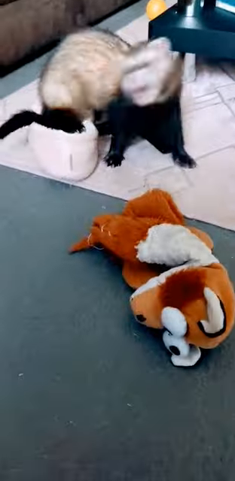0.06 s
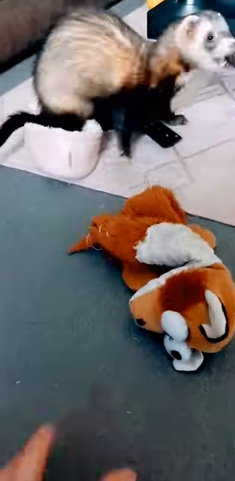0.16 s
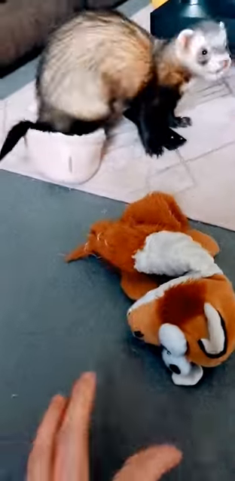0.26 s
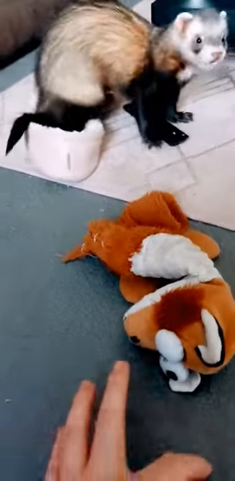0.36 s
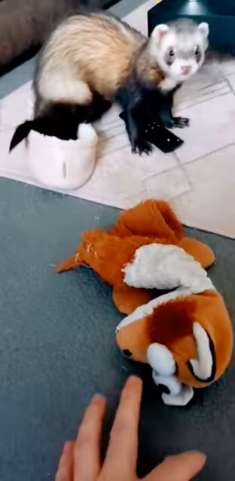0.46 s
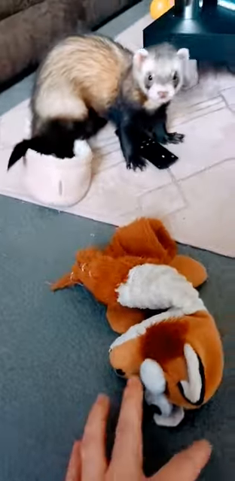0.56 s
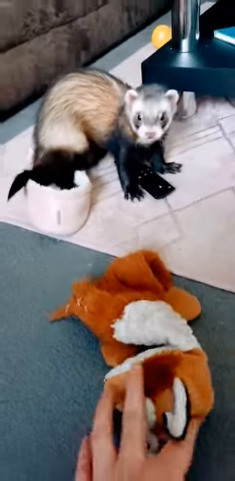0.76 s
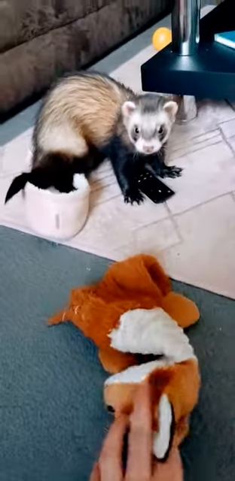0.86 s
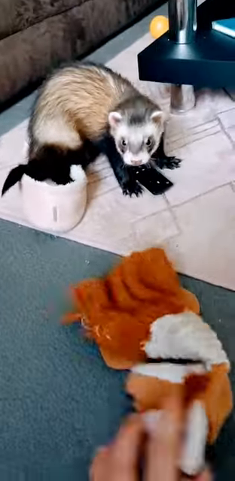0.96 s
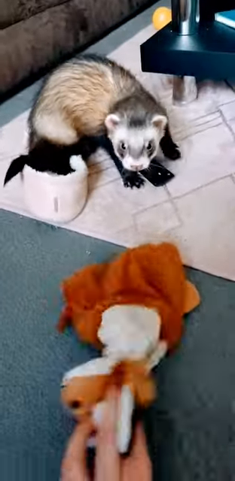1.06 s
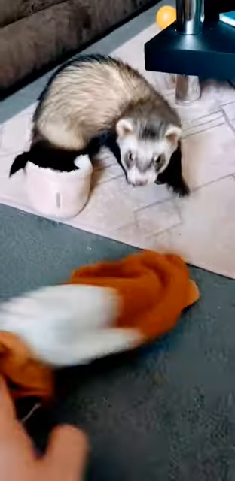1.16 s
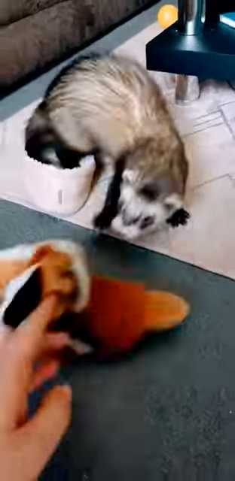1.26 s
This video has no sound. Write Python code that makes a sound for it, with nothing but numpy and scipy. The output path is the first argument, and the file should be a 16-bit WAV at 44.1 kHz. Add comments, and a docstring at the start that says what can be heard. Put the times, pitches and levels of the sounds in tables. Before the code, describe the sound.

Low handling rumble and a stutter of soft bumps as someone picks up a plush toy close to the microphone. Cloth swishes, a sharp tick sounds, then the toy brushes over carpet in a quiet room.

```python
"""A low rumble with a stutter of soft bumps, as someone picks up a plush toy close to the microphone.
The shifting grip rumbles by friction, and each stick and slip excites damped modes. Cloth swishes with
the reach, then the plush brushes over the carpet: in both, many fibres catch and let go. Small impacts
add sharp ticks and, at the end, a hollow knock. The faint hiss of a quiet room lies under it all."""
import sys
import numpy as np
from scipy import signal
from scipy.fft import rfft, irfft
from scipy.io import wavfile
from scipy.ndimage import uniform_filter1d

SR = 44100
rng = np.random.default_rng(int(sys.argv[2]) if len(sys.argv) > 2 else 0)


def generate_wav(signal):
    """Clip the signal to [-1, 1] and save it as 16-bit WAV at the path in sys.argv[1]."""
    frames = np.transpose(np.atleast_2d(signal))
    scaled = np.clip(frames, -1, 1) * 32767
    pcm = np.round(scaled).astype(np.int16)
    wavfile.write(sys.argv[1], SR, pcm)


N = 57330

# Envelopes. Each row: time in seconds, relative level in dB.
GRIP_ENVELOPE = [(0, -60), (0.09, -68), (0.13, -71), (0.195, -78), (0.219, -50), (0.27, -35.5), (0.29, -44),
                 (0.33, -36), (0.4, -31.5), (0.47, -31), (0.521, -29.5), (0.565, -37.5), (0.62, -37.5),
                 (0.655, -47.5), (0.702, -42.5), (0.76, -59), (0.82, -62.5), (0.89, -70), (0.91, -46),
                 (0.96, -52), (1.0, -52.5), (1.085, -45), (1.14, -54), (1.22, -67), (1.3, -85)]
DEEP_ENVELOPE = [(0, -48), (0.04, -67.5), (0.083, -58), (0.12, -87), (0.195, -86.5), (0.214, -42.5),
                 (0.29, -61), (0.34, -55), (0.44, -56), (0.532, -36), (0.565, -55), (0.611, -37),
                 (0.66, -59.5), (0.73, -47.5), (0.839, -69), (0.89, -70), (0.915, -57.5), (1.139, -54.5),
                 (1.24, -73.5)]  # the deepest part of the rumble
CLOTH_ENVELOPE = [(0, -88), (0.19, -70.5), (0.28, -60.5), (0.39, -57), (0.44, -60), (0.52, -55.5),
                  (0.57, -58.5), (0.66, -66.5), (0.8, -78), (1.1, -73.5), (1.3, -72)]
PLUSH_ENVELOPE = [(0, -69), (0.42, -71), (0.52, -68), (0.7, -60), (0.84, -62), (0.93, -61.5), (1.03, -63.5),
                  (1.11, -74), (1.16, -66.5), (1.21, -77), (1.26, -77.5), (1.29, -69.5)]  # plush over the carpet
FUR_ENVELOPE = [(0.25, -82), (0.43, -62), (0.47, -61.5), (0.53, -56.5), (0.56, -60.5), (0.66, -68),
                (0.8, -100)]  # a bright swish as the fingers reach the fur
HISS_ENVELOPE = [(0, -69.5), (0.14, -62.5), (0.5, -70), (0.75, -63), (0.98, -67), (1.15, -72), (1.3, -77)]

# Noise spectra. Each row: frequency in Hz, relative spectral density in dB.
GRIP_SPECTRUM = [(40, -41), (70, -6.5), (97, 3.5), (155, -1.5), (185, -7), (235, -6.5), (270, -14),
                 (305, -25), (450, -26.5), (700, -29), (900, -40.5), (1500, -58)]
DEEP_SPECTRUM = [(20, -35), (40, -39), (52, -19), (66, 3), (78, -7.5), (96, 1), (125, -24), (300, -53.5)]
CLOTH_SPECTRUM = [(300, 2.5), (700, 2.5), (1000, -2), (1400, 6), (1700, -1.5), (2300, 2.5), (3200, -5),
                  (4300, -10), (7200, -4.5), (8500, -13.5), (15000, -17)]
PLUSH_SPECTRUM = [(300, 6.5), (800, 2), (1400, 4), (2200, 1), (3300, 1), (4700, -1), (6000, -9.5),
                  (7500, -8), (10000, -18.5), (15000, -5.5)]
FUR_SPECTRUM = [(1500, -43), (3200, -3.5), (4100, 6), (5500, -2), (7200, -4.5), (8300, -6.5), (13000, -6),
                (15500, -0.5)]
SCUFF_SPECTRUM = [(400, -1.5), (700, -3), (1250, 1.5), (1700, -12), (2500, -21), (5000, -14.5),
                  (12000, -35)]
ROOM_SPECTRUM = [(25, -7), (60, 25.5), (120, 23.5), (200, 4), (350, -11.5), (600, 8), (1000, -9.5),
                 (2000, -10.5), (5000, -15.5), (10000, -12.5), (13500, -2.5), (15300, -1)]
HISS_SPECTRUM = [(1500, -7.5), (4000, -6.5), (9000, 1.5), (13500, -7), (15300, 7)]

# Slips of the grip. Each row: start in seconds, strength in dB, roll-off corner in Hz, bass gain in dB.
GRIP_SLIPS = [(0.026, -49, 1030, -15), (0.045, -61, 1010, 8.5), (0.078, -54, 507, 0.5),
              (0.196, -48, 900, 1.5), (0.214, -26, 122, -6.5), (0.258, -41, 500, -6),
              (0.302, -40.5, 800, 4.5), (0.34, -49.5, 700, 12), (0.392, -40, 445, 11.5),
              (0.433, -35.5, 760, -1), (0.468, -45.5, 400, 19.5), (0.498, -45, 322, 17),
              (0.518, -46, 199, -10), (0.548, -42, 526, 10), (0.578, -33, 400, 1), (0.629, -40.5, 705, 4.5),
              (0.685, -43, 400, 3), (0.722, -50.5, 500, 4.5), (0.896, -45.5, 650, 2), (0.916, -45, 395, -5),
              (0.98, -42, 550, -3), (1.035, -44, 514, -14), (1.078, -56, 250, 3)]

# Brief contacts. Each row: time in seconds, relative strength in dB.
SCUFF_STROKES = [(0.44, -54), (0.695, -57), (0.91, -65.5)]
TICK_IMPACTS = [(0.041, -44), (0.46, -27.5), (0.48, -43)]
KNOCK_IMPACTS = [(1.286, -52.5)]

# Resonances. Each row: frequency in Hz, relative level in dB, time to decay by 60 dB in seconds.
BUMP_RESONANCES = [(99.5, -4, 0.14), (132, -4.5, 0.13), (164.5, -2, 0.086), (232.2, -4, 0.15),
                   (332, -3, .05), (411.4, -8, 0.064), (483.7, -11, 0.11), (563, -7.5, 0.068),
                   (672, -9.5, 0.14), (843, -9.5, .025), (1380, -11, 0.18)]
TICK_RESONANCES = [(4670, -18, .003), (6700, -13, .002), (9450, -16, 0.004), (11700, -7, 0.0012),
                   (13000, -11, 0.0018)]
KNOCK_RESONANCES = [(310, 1.5, 0.056), (390, 1.5, 0.018), (500, -20, 0.018)]

# Echoes from floor and furniture. Each row: delay in seconds, level against the direct sound in dB.
EARLY_ECHOES = [(.0011, -39), (.0023, -29), (.0043, -20.5), (.0071, -20.5)]

RUMBLE_FLUTTER_DB, RUMBLE_SMOOTHING_S, RUMBLE_TOP_HZ = 0.47, 0.018, 1310
BUMP_GAIN_DB, BUMP_SPREAD_DB, BUMP_LOW_CUT_HZ, BASS_EDGE_HZ = -2.5, 1.5, 72, 260
DRAG_S, DRAG_SHARE = 0.02, 0.53
FIBRES_PER_S, FIBRE_SPREAD_DB, FIBRE_SHARE = 5000, 2, 0.32
SCUFF_SIGMA_S = 0.006
TICK_TAIL_GAIN_DB, TICK_TAIL_T60_S, TICK_LOW_CUT_HZ = -29.5, 0.075, 5000
ROOM_NOISE_DB, ROOM_TAIL_DB, ROOM_T60_S = -65, -14, 0.07
MIC_LOW_CUT_HZ, MIC_HIGH_CUT_HZ = 30, 15450


def grip_rumble(spectrum, levels, gain_db):
    """Friction of the grip makes low-frequency noise whose amplitude follows the handling."""
    noise = coloured(rng.standard_normal(N), spectrum)
    power = np.abs(signal.hilbert(noise)) ** 2 / 2
    mean_power = uniform_filter1d(power, int(RUMBLE_SMOOTHING_S * SR) + 1)
    even_noise = noise / np.sqrt(mean_power + 1e-9)
    rumble = even_noise * envelope(levels) * from_db(gain_db + RUMBLE_FLUTTER_DB * drift(hz=45))
    return signal.sosfilt(signal.butter(2, RUMBLE_TOP_HZ, fs=SR, output="sos"), rumble)


def grip_bumps():
    """Stick-slip excitation: each slip pushes damped modes, then drags briefly on those above the bass."""
    starts, slip_db, corner_hz, bass_db = np.transpose(GRIP_SLIPS)
    scatter_db = BUMP_SPREAD_DB * rng.standard_normal((len(starts), len(BUMP_RESONANCES)))
    fade = np.exp(-1 / (DRAG_S * SR))
    grit, bumps = rng.standard_normal(N), np.zeros(N)
    for k, (hz, mode_db, t60) in enumerate(BUMP_RESONANCES):
        gains = from_db(slip_db + mode_db + bass_db * (hz < BASS_EDGE_HZ) + scatter_db[:, k])
        push = impulses(starts, gains / (1 + (hz / corner_hz) ** 2))  # soft contact spares upper modes
        drag = grit * np.sqrt(signal.lfilter([1 - fade], [1, -fade], push ** 2))
        force = np.sqrt(1 - DRAG_SHARE) * push + np.sqrt(DRAG_SHARE) * drag * (hz > BASS_EDGE_HZ)
        bumps += (-1) ** k * ring(force, hz, t60)
    return from_db(BUMP_GAIN_DB) * low_cut(bumps, BUMP_LOW_CUT_HZ)


def fibre_rustle(spectrum, levels, flutter_db):
    """Shot noise: fibres catch and let go in dense random clicks over a smooth friction swish."""
    sizes = from_db(FIBRE_SPREAD_DB * np.minimum(rng.exponential(1, N), 5))
    signs = rng.choice([-1, 1], N)
    releases = rng.random(N) < FIBRES_PER_S / SR
    clicks = unit_rms(sizes * signs * releases)
    friction = np.sqrt(FIBRE_SHARE) * clicks + np.sqrt(1 - FIBRE_SHARE) * rng.standard_normal(N)
    return coloured(friction, spectrum) * envelope(levels) * from_db(flutter_db * drift(hz=20))


def finger_scuffs():
    """Sliding friction of fingers on the toy gives noise in brief Gaussian pulses."""
    t = np.arange(N) / SR
    strokes = sum(from_db(db) * np.exp(-.5 * ((t - s) / SCUFF_SIGMA_S) ** 2) for s, db in SCUFF_STROKES)
    return strokes * coloured(rng.standard_normal(N), SCUFF_SPECTRUM)


def ticks():
    """Hard little impacts excite high modes; reverberation adds a short bright tail."""
    starts, db = np.transpose(TICK_IMPACTS)
    force = low_cut(impulses(starts, from_db(db)), TICK_LOW_CUT_HZ)
    direct = modal_response(force, TICK_RESONANCES)
    tail = signal.fftconvolve(direct, decaying_noise(TICK_TAIL_T60_S))[:N]
    return direct + from_db(TICK_TAIL_GAIN_DB) * tail


def hollow_knock():
    """A light impact as the toy swings up sets heavily damped modes in free vibration."""
    starts, db = np.transpose(KNOCK_IMPACTS)
    return modal_response(impulses(starts, from_db(db)), KNOCK_RESONANCES)


def background():
    """The noise floor: steady broadband room noise and a high hiss that swells a little."""
    room = from_db(ROOM_NOISE_DB) * coloured(rng.standard_normal(N), ROOM_SPECTRUM)
    return room + envelope(HISS_ENVELOPE) * coloured(rng.standard_normal(N), HISS_SPECTRUM)


def in_room(x):
    """Convolution with a carpeted room's unit-energy response: direct sound, echoes, short tail."""
    delays, db = np.transpose(EARLY_ECHOES)
    tail = decaying_noise(ROOM_T60_S)
    response = impulses(delays, from_db(db)) + from_db(ROOM_TAIL_DB) * tail / np.linalg.norm(tail)
    response[0] += 1
    return signal.fftconvolve(x, response / np.linalg.norm(response))[:N]


def modal_response(force, modes):
    """Superposition of damped modes, alternating in sign."""
    return sum((-1) ** k * from_db(db) * ring(force, hz, t60) for k, (hz, db, t60) in enumerate(modes))


def ring(force, hz, t60):
    """A damped oscillator: a unit impulse starts a decaying sine of amplitude one."""
    decay = np.exp(-np.log(1000) / (t60 * SR))
    omega = 2 * np.pi * hz / SR
    return signal.lfilter([0, np.sin(omega)], [1, -2 * decay * np.cos(omega), decay ** 2], force + 1e-18)


def decaying_noise(t60):
    """A diffuse field decays exponentially, by 60 dB in t60 seconds."""
    return rng.standard_normal(N) * np.exp(-np.log(1000) * np.arange(N) / SR / t60)


def impulses(seconds, gains):
    """Single-sample impulses at the given times."""
    return np.bincount(np.clip((seconds * SR).astype(int), 0, N - 1), gains, N)


def envelope(levels):
    """Amplitude over time, interpolated in decibels."""
    seconds, db = np.transpose(levels)
    return from_db(np.interp(np.arange(N) / SR, seconds, db))


def coloured(x, spectrum):
    """Spectral shaping, interpolated over log frequency; unit rms."""
    hz, db = np.transpose(spectrum)
    bin_hz = np.maximum(np.arange(N // 2 + 1) * SR / N, 1)
    gains = from_db(np.interp(np.log(bin_hz), np.log(hz), db))
    return unit_rms(irfft(rfft(x) * gains, N))


def drift(hz):
    """Low-passed noise gives a slow random fluctuation of unit rms."""
    pole = np.exp(-2 * np.pi * hz / SR)
    return unit_rms(signal.lfilter([1], [1, -2 * pole, pole ** 2], rng.standard_normal(2 * N))[N:])


def low_cut(x, hz):
    """Second-order high-pass."""
    return signal.sosfilt(signal.butter(2, hz, "high", fs=SR, output="sos"), x)


def from_db(db):
    """Decibels to amplitude ratio."""
    return 10 ** (np.asarray(db) / 20)


def unit_rms(x):
    """Normalisation to unit power."""
    return x / np.sqrt(np.mean(x ** 2) + 1e-20)


def scene():
    """Superposition: the pressures of all sources add at one close microphone."""
    grip = grip_rumble(GRIP_SPECTRUM, GRIP_ENVELOPE, gain_db=-3.5)
    grip += grip_rumble(DEEP_SPECTRUM, DEEP_ENVELOPE, gain_db=-1)
    cloth = fibre_rustle(CLOTH_SPECTRUM, CLOTH_ENVELOPE, flutter_db=0.04)
    plush = fibre_rustle(PLUSH_SPECTRUM, PLUSH_ENVELOPE, flutter_db=0.34)
    fur = fibre_rustle(FUR_SPECTRUM, FUR_ENVELOPE, flutter_db=-1.2)
    contacts = grip_bumps() + hollow_knock() + ticks()
    return (grip + contacts + in_room(cloth + plush + fur + finger_scuffs() + background()))[None]


def record(dry):
    """Band limiting: the microphone loses the lowest bass, and a steep low-pass cuts the top."""
    high_cut = signal.ellip(12, .1, 70, MIC_HIGH_CUT_HZ, fs=SR, output="sos")
    return signal.sosfilt(high_cut, low_cut(dry, MIC_LOW_CUT_HZ))


dry = scene()
out = record(dry)
generate_wav(out)
```